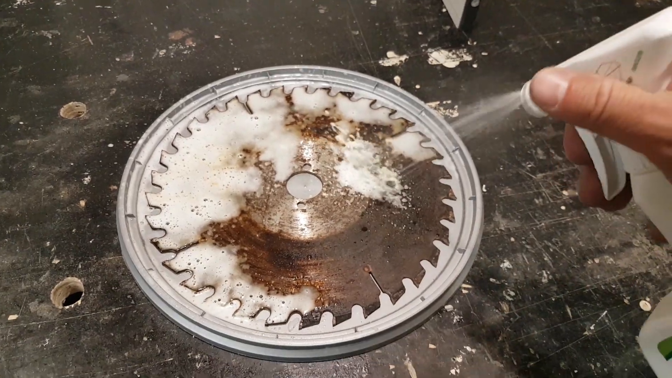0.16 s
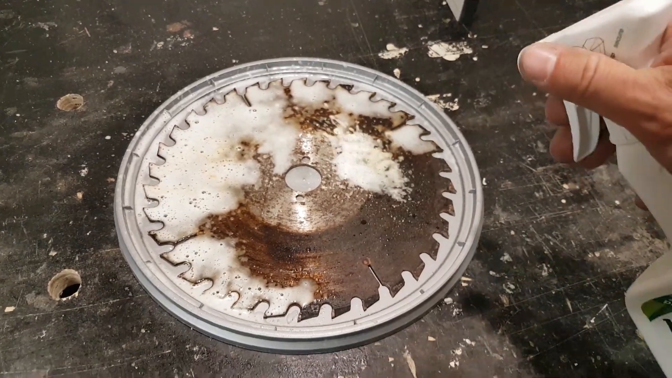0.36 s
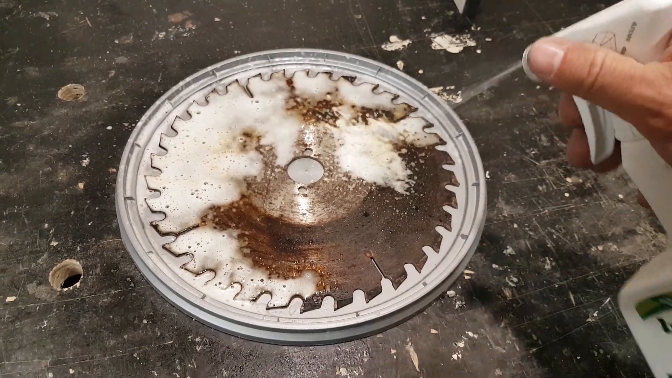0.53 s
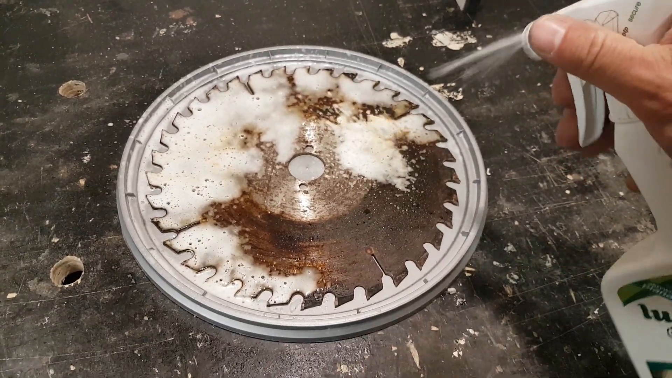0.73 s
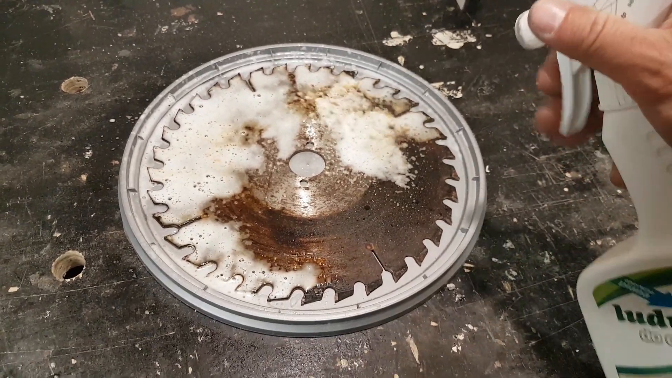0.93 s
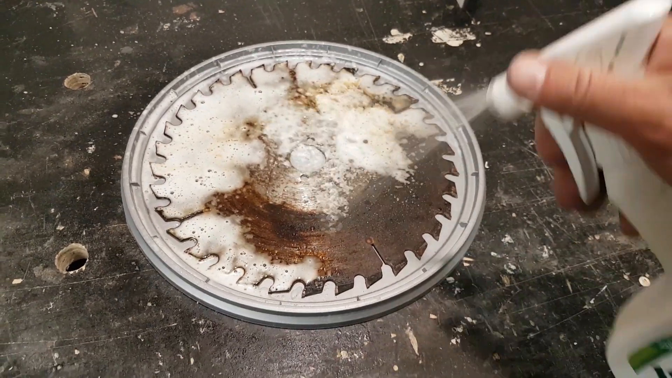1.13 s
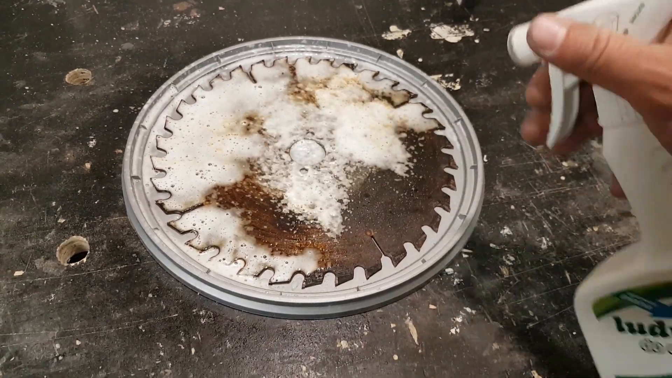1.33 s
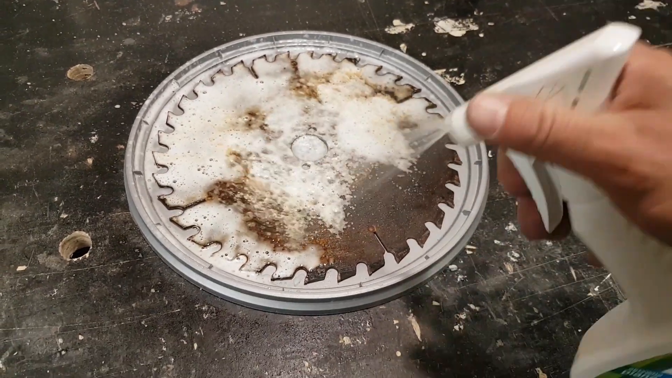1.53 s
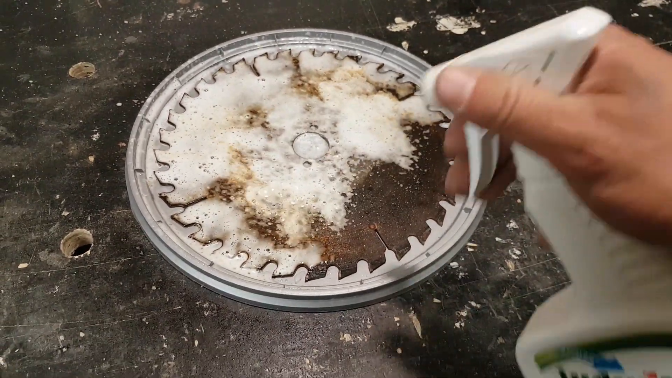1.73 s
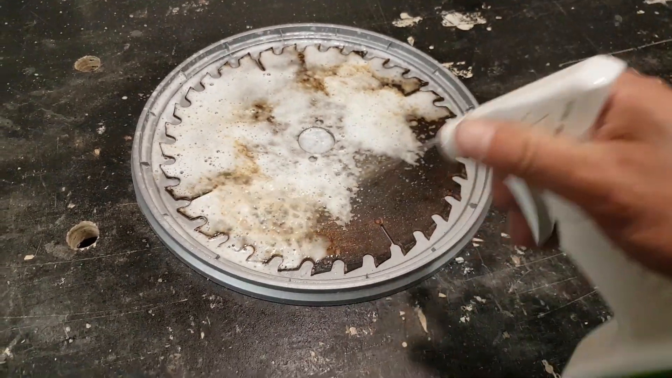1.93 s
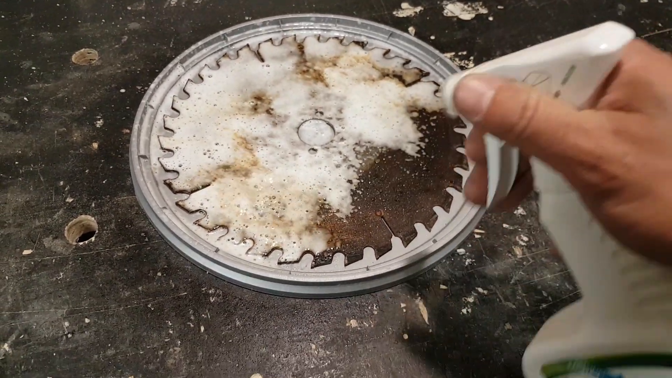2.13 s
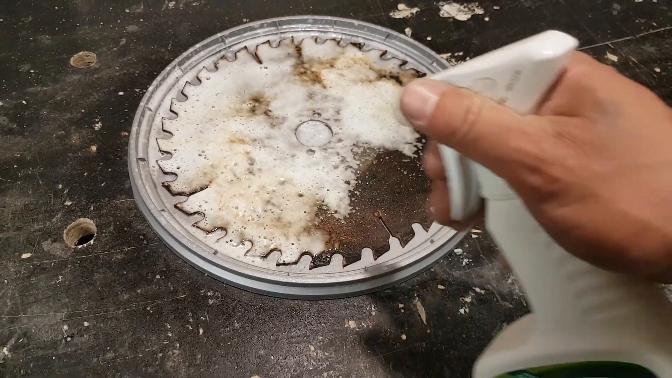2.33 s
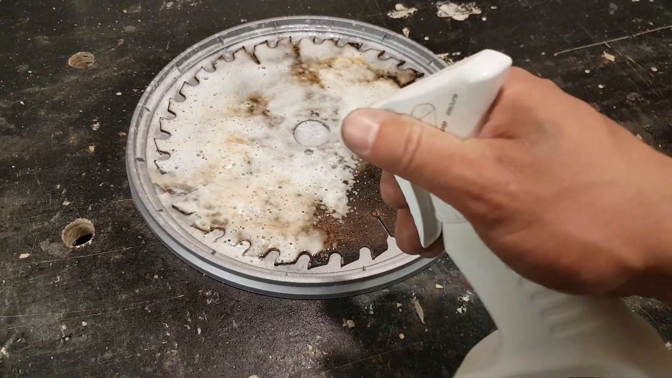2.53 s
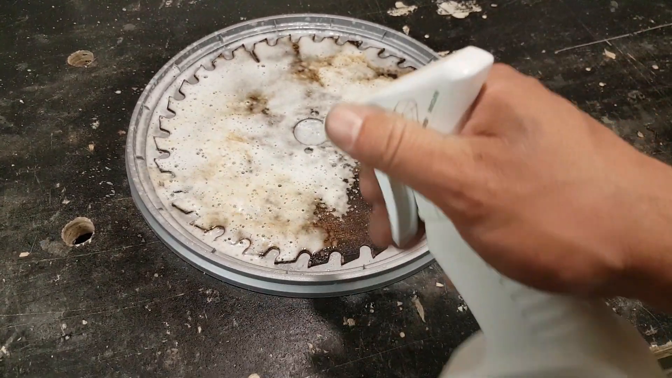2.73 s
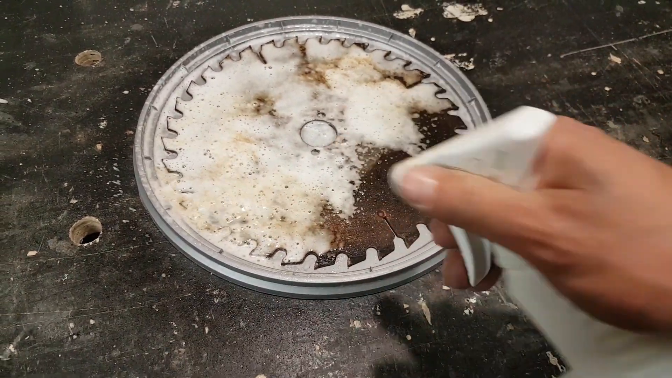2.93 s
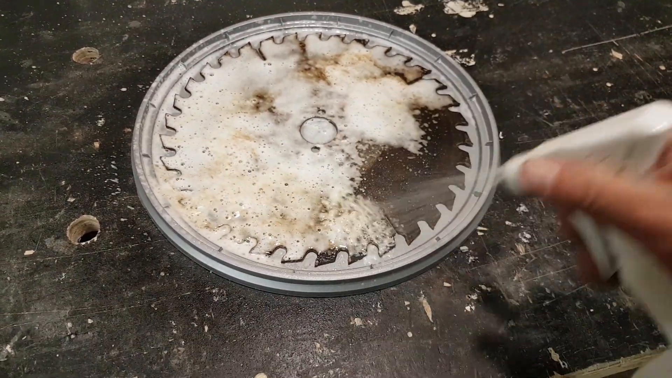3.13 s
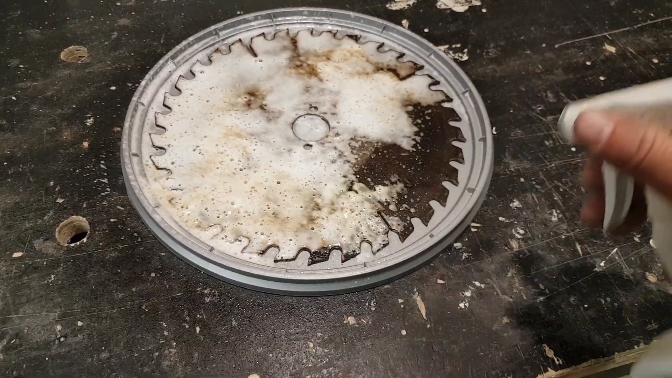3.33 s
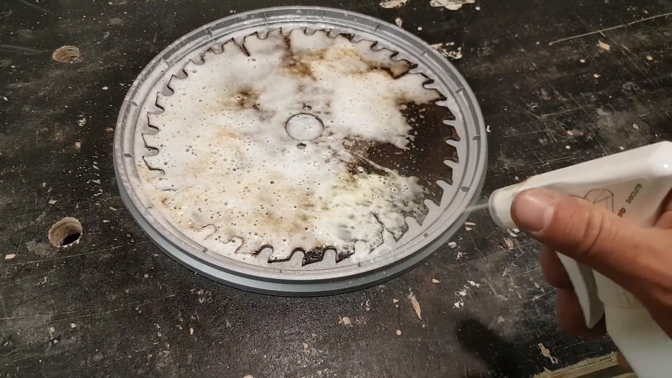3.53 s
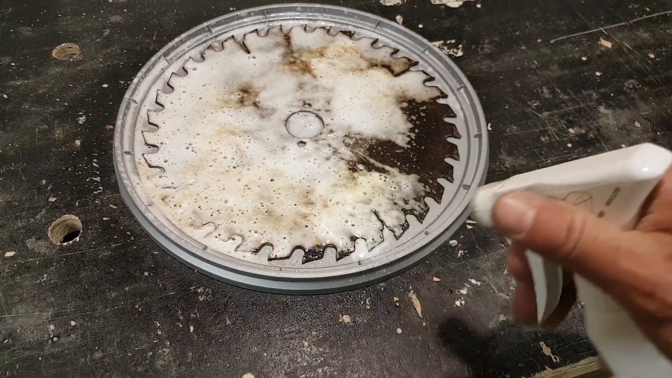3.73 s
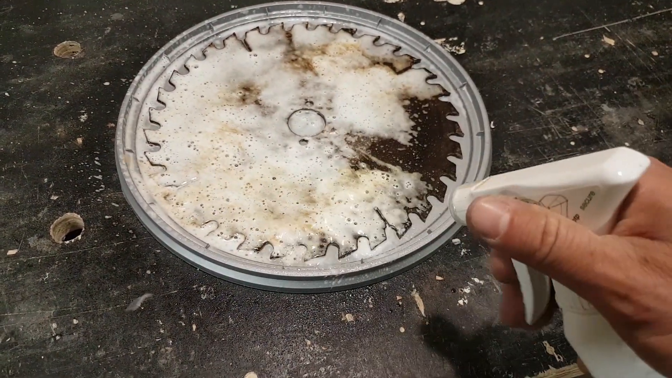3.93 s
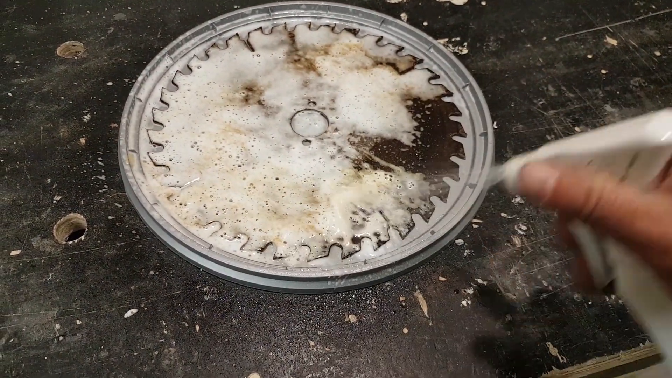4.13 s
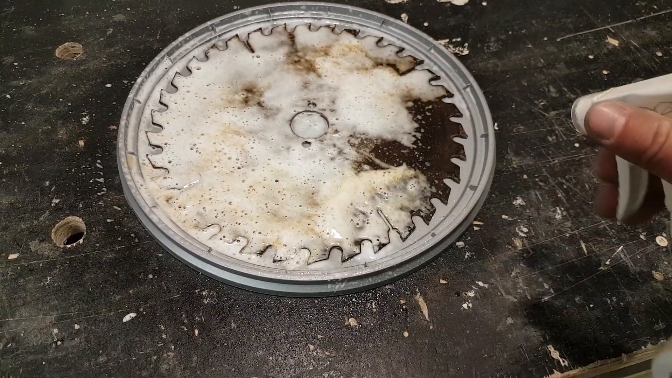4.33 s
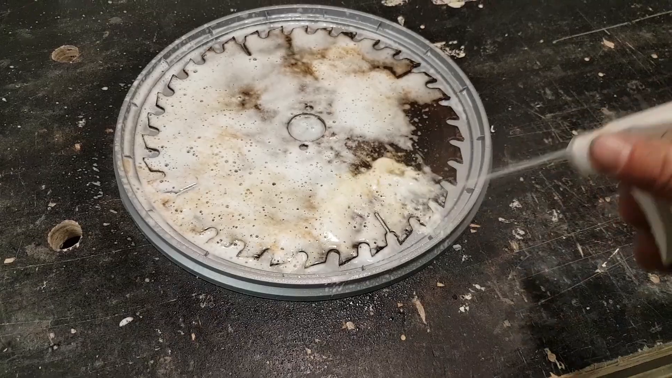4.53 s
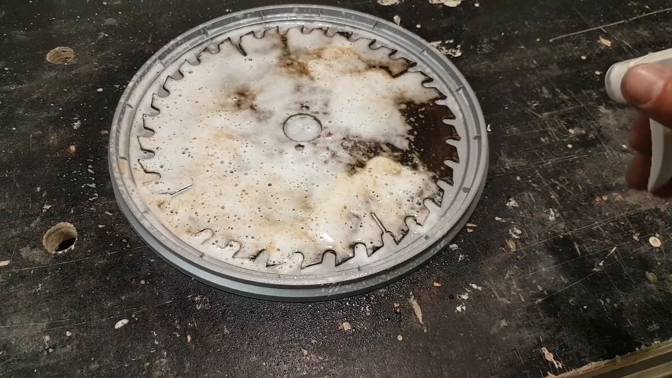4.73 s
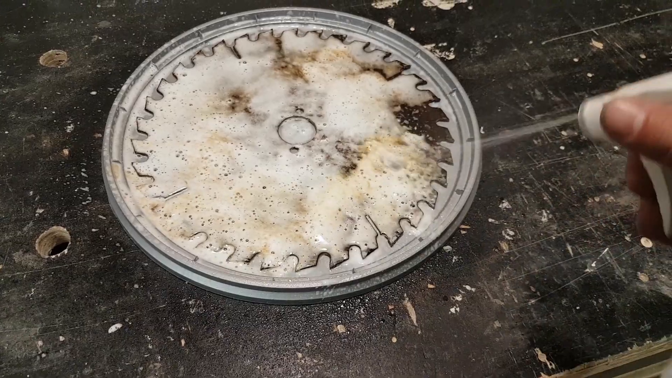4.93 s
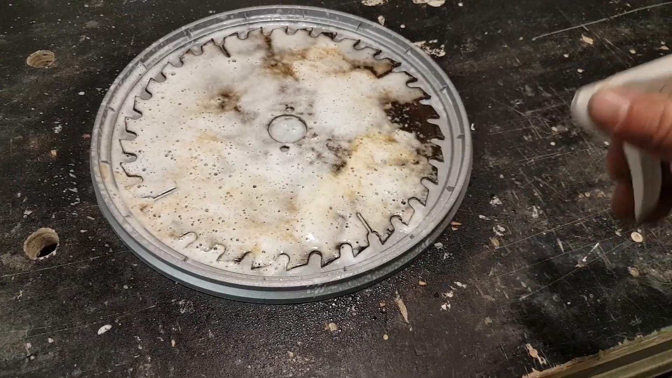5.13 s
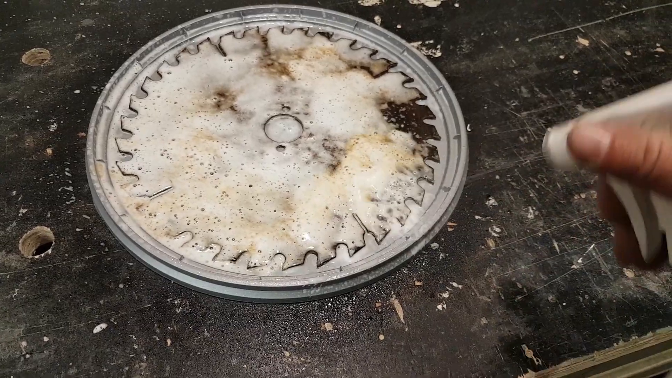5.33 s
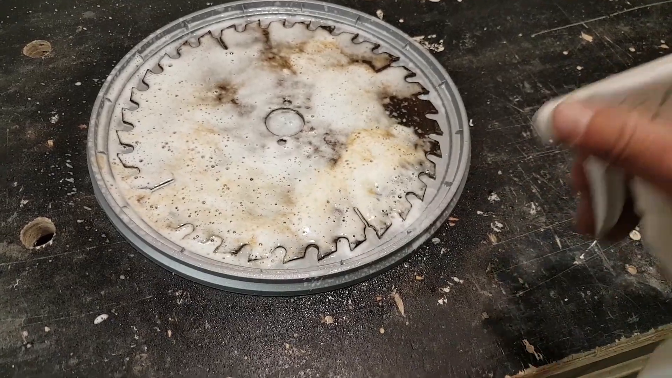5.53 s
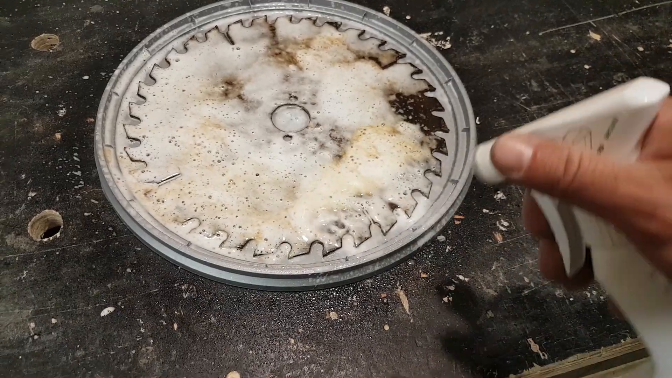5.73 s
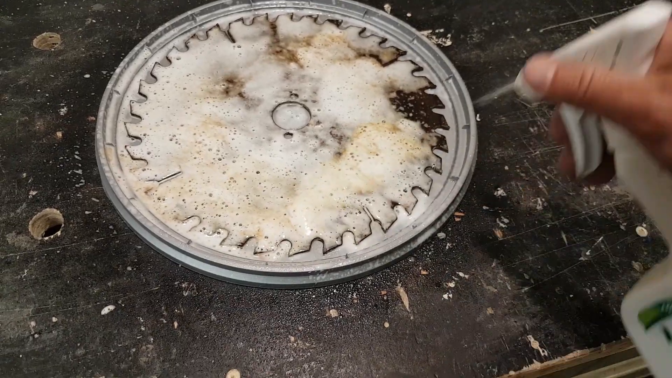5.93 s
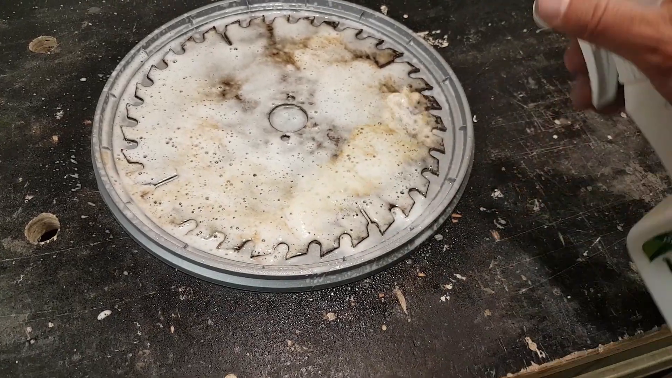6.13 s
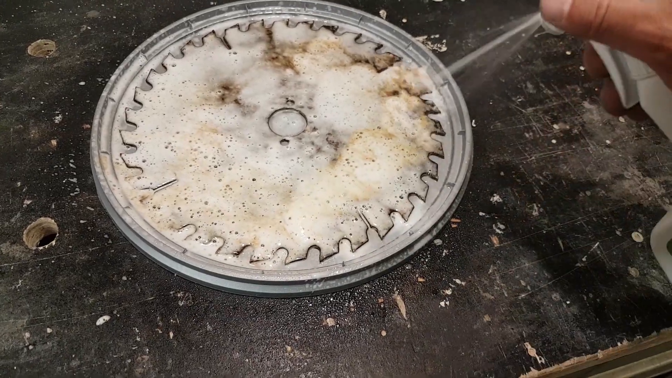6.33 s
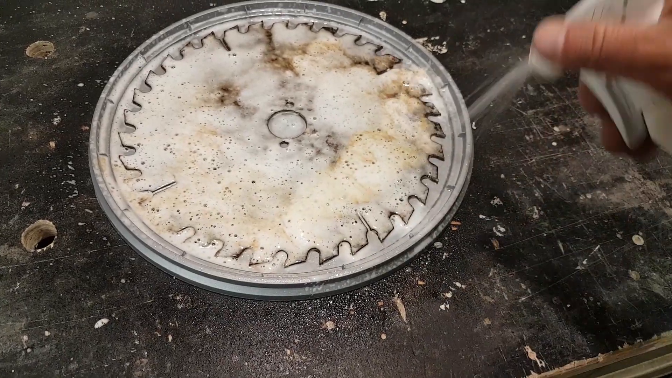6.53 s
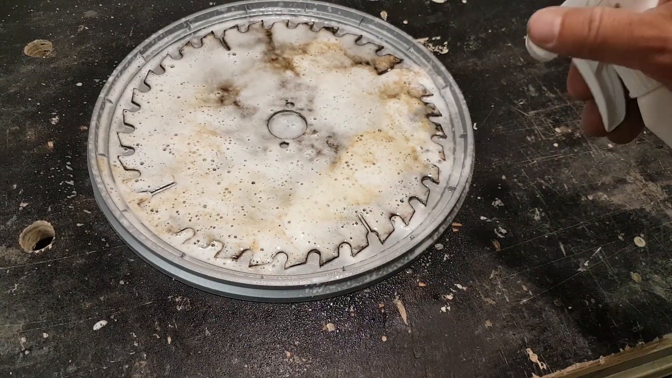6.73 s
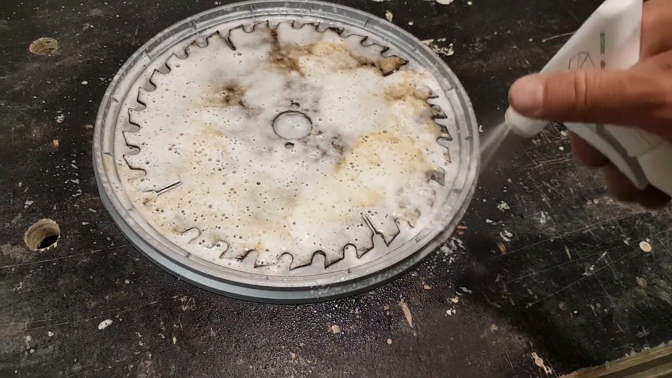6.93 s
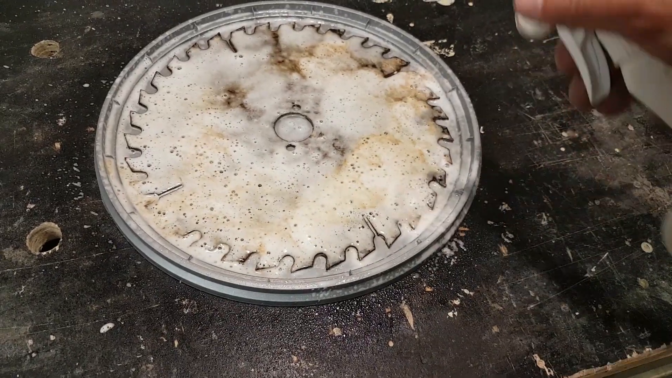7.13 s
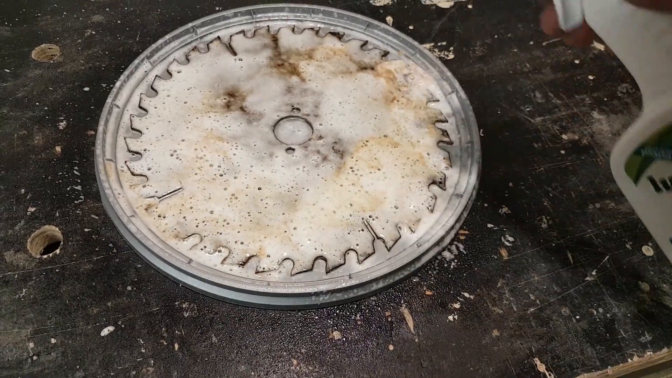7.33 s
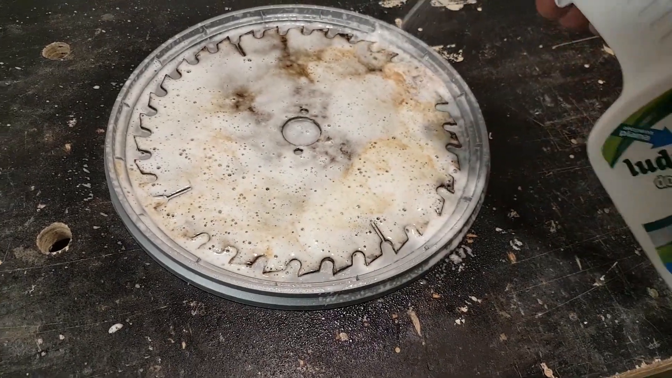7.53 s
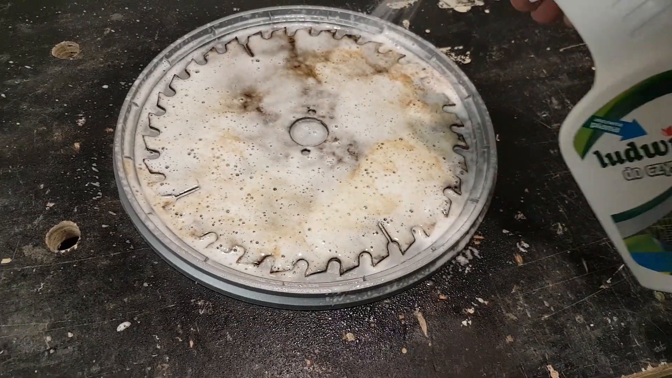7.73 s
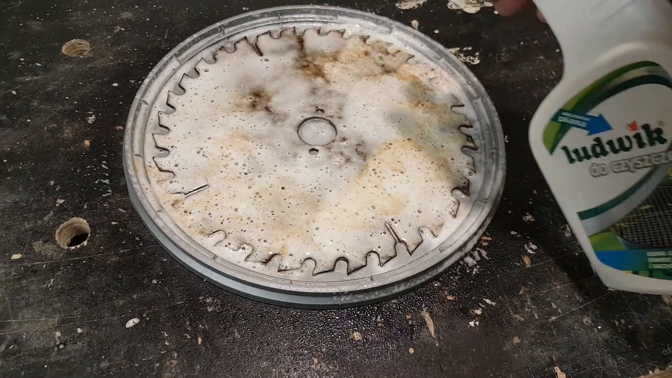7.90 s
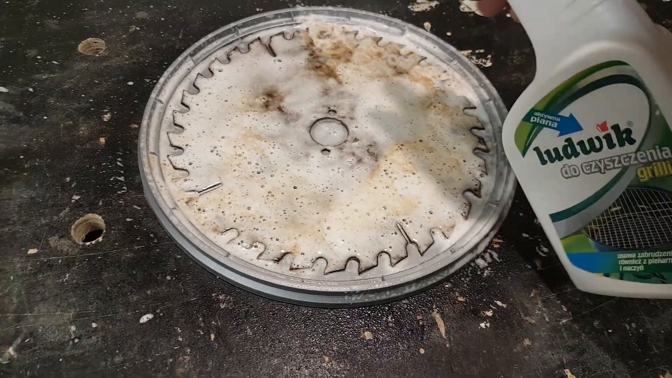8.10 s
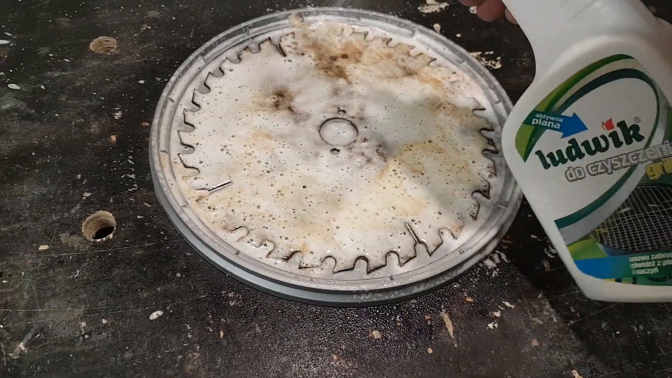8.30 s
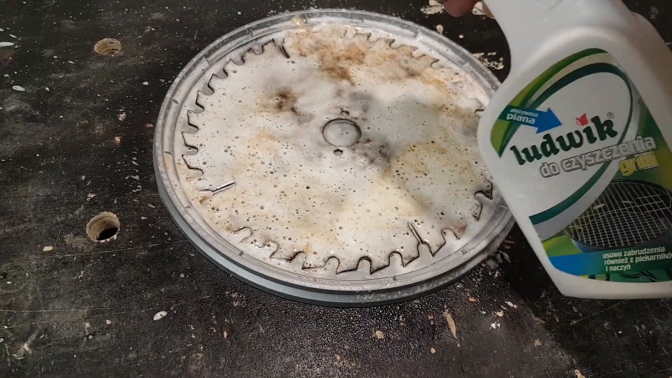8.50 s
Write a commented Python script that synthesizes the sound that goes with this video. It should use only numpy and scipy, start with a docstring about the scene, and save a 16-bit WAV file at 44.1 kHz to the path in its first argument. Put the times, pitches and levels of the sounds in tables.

```python
"""Two faint trigger taps, then a bright hiss: a trigger bottle is pumped about three times a second.
It sprays foam cleaner on a saw blade in a plastic lid, each squeeze being noise in the nozzle's resonances.
Tiny random impacts patter on the foam; the trigger's knock is a ring of sines with a noise snap.
Air sips, single big drops and two dull bench thuds with rebounds join in.
A small workshop answers with decaying noise tails, over quiet air and low rumble."""
import sys
import numpy as np
from scipy import signal
from scipy.fft import rfft, irfft, next_fast_len
from scipy.io import wavfile
from scipy.ndimage import map_coordinates

SR = 44100
rng = np.random.default_rng(int(sys.argv[2]) if len(sys.argv) > 2 else 0)


def int16_out(signal):
    """Quantize to a 16-bit WAV file."""
    q = np.round(np.clip(np.atleast_2d(signal).T, -1, 1) * 32767)
    wavfile.write(sys.argv[1], SR, q.astype(np.int16))


N = 381906  # length [samples]

# Table levels are relative: each layer adds its own trim.
# Squeezes: (start [s], trigger let go [s], hiss [dB], whistle [dB], throat [dB], throat pitch [Hz], splash [dB])
SQUEEZES = [(0.13, 0.318, -29.5, -38.5, -39.5, 3220, -48), (0.484, 0.632, -32.5, -40.5, -38.5, 3460, -54),
            (0.773, .954, -29, -37.5, -36, 3350, -48.5), (1.099, 1.317, -25, -37.5, -37.5, 3180, -45.5),
            (1.493, 1.691, -23.5, -37.5, -37.5, 3170, -46.5), (1.837, 2.029, -24, -36, -37, 3000, -46),
            (2.217, 2.401, -25, -37.5, -35.5, 3250, -46), (2.525, 2.666, -26, -35, -36, 3090, -48),
            (2.795, 2.963, -25, -34.5, -36.5, 3110, -47.5), (3.097, 3.269, -24, -35.5, -40.5, 3300, -45),
            (3.427, 3.65, -26, -37.5, -43.5, 3540, -44), (3.813, 3.984, -26.5, -36.5, -38.5, 3340, -46),
            (4.128, 4.29, -26.5, -35, -41.5, 3300, -47.5), (4.438, 4.651, -26, -38.5, -43, 3780, -44),
            (4.828, 5.038, -27, -38, -38.5, 3480, -46.5), (5.205, 5.421, -29, -39.5, -38.5, 3410, -44.5),
            (5.615, 5.812, -28, -38, -39.5, 3470, -47), (5.988, 6.162, -26.5, -37.5, -39.5, 3550, -48.5),
            (6.292, 6.456, -27, -35, -35.5, 3600, -44), (6.575, 6.724, -28.5, -33.5, -42.5, 3540, -42.5),
            (6.882, 7.064, -28, -33.5, -41.5, 3470, -41), (7.212, 7.367, -31.5, -40, -35, 3580, -44.5),
            (7.483, 7.627, -30, -43, -36, 3420, -46.5), (7.746, 7.89, -33, -43.5, -35.5, 3440, -45),
            (8.006, 8.158, -31, -41.5, -36, 3440, -45.5), (8.277, 8.433, -32, -42, -37, 3330, -48.5),
            (8.562, 8.726, -34, -45, -38, 3200, -45)]
# Mist leaving the nozzle, also the colour of the air sips: (frequency [Hz], level [dB])
MIST_SPECTRUM = [(1500, -56), (4000, -9.5), (5600, -17.5), (6500, -6.5), (7500, -33.5), (9000, -10),
                 (10300, -14.5), (11700, -2.5), (13500, -4), (15000, -2.5), (15700, -1.5), (16000, -24)]
# Fine droplets landing on foam: (frequency [Hz], level [dB])
SPLASH_SPECTRUM = [(150, -19), (400, -12.5), (800, -21), (1300, -3), (2100, -2), (3000, -3), (5000, -2.5),
                   (9000, -8), (16000, -5)]
# Heavy drops slapping the wet blade: (frequency [Hz], level [dB])
SLAP_SPECTRUM = [(200, -32), (700, -15.5), (1250, -5), (2100, 3.5), (2800, -1.5), (4500, -16.5),
                 (10000, -36)]
# Where the nozzle points, as a lean of the top hiss to the left: (time [s], level [dB])
NOZZLE_AIM = [(0, 11), (1.1, 9), (2.55, 17), (4.1, 12), (4.5, 8.5), (6.3, 10), (7.2, 2.5), (8, 11)]
# Thin edge tone, faint until it sings in the last squirts: (time [s], level [dB])
EDGE_LEVEL = [(7.3, -56), (7.75, -35.5), (8.3, -39), (8.6, -36)]
# The pump's ring: (frequency [Hz], level [dB], decay by 60 dB [s], rise [s])
PUMP_MODES = [(126, -7.5, 0.097, 0.011), (219, -1.5, 0.061, 0.0079), (259, -1.5, 0.053, 0.0021),
              (314.6, 2, 0.039, 0.0013), (522, -7.5, 0.081, 0.0032), (649, -5, 0.035, 0.00029),
              (727, 3.5, 0.0081, 0.00076), (1317, 3, 0.03, 0.0001), (1530, -8, 0.0038, 0.00035)]
# The lever's ring: (frequency [Hz], level [dB], decay by 60 dB [s], rise [s])
LEVER_MODES = [(307, 11, 0.034, 0.0019), (484, 7.5, 0.032, 0.002), (668, 3, 0.02, 0.0018),
               (754, 7.5, 0.014, 0.0013), (1520, -2, 0.031, 0.00071)]
# The hollow plastic body: (frequency [Hz], level [dB])
BODY_SPECTRUM = [(70, -35), (170, -8), (280, -5.5), (550, -6.5), (800, -5.5), (1000, -13), (1400, -8.5),
                 (2000, -12), (4000, -35), (12000, -43)]
# Two taps as the finger takes up the trigger's slack: (time before the squeeze [s], peak [dB])
SLACK_TAPS = [(.052, -44.5), (.025, -46.5)]
# The pump sucks air with a brief hiss as it refills: (time [s], level [dB])
SIPS = [(1.73, -57), (2.075, -56), (3.012, -51), (3.315, -47.5), (3.70, -52), (4.335, -48.5), (6.774, -55),
        (7.111, -47.5)]
# Big drops and spits: (time [s], peak [dB])
SPITS = [(.3394, -44), (1.1734, -22.5), (1.1925, -24), (1.212, -30), (1.7953, -41), (1.9484, -36),
         (6.341, -17.5), (6.3524, -19.5), (6.3664, -19.5), (6.3784, -25), (6.4234, -27.5)]
# Thuds in the bench and their rebounds: (time [s], level [dB], rattle [dB], low boom [dB])
THUDS = [(.735, -33, -12, -23), (.769, -44, -16, -10), (6.194, -23, -3, -9.5), (6.221, -37.5, 0, -17),
         (6.243, -36, -4, 0.5), (6.269, -39, -17, 4)]
# The bench's ring: (frequency [Hz], level [dB], decay by 60 dB [s], rise [s])
BENCH_MODES = [(70.7, -32, .3, .004), (117, -12, 0.34, 0.01), (139.3, -4, 0.82, 0.0026),
               (175, 10, 0.056, 0.0011), (223.7, -3, 0.208, 0.0011), (265, -4, 0.14, 0.00092),
               (370, -10.5, 0.27, 0.0009), (403, -9, 0.14, 0.0011), (518.5, -9, 0.2, 0.0011),
               (654, -22.5, 0.2, 0.00102)]
# Loose things on the bench: (frequency [Hz], level [dB])
RATTLE_SPECTRUM = [(60, -24), (160, -8), (260, 4.5), (400, -11), (600, -1.5), (850, -16), (2300, -11.5),
                   (4000, -44)]
# The bench's deep boom: (frequency [Hz], level [dB])
BOOM_SPECTRUM = [(25, -37.5), (55, -12.5), (90, -22), (140, -2), (220, -11), (400, -28), (1000, -72)]
# The workshop's tail: (frequency [Hz], decay by 60 dB [s])
ROOM_DECAY = [(150, 0.1), (600, 0.61), (1500, 0.45), (3500, 0.37), (8000, 0.27), (13000, 0.21),
              (16000, 0.2)]
# Still air: (frequency [Hz], level [dB])
AIR_SPECTRUM = [(15, -57), (25, -14.5), (90, -2), (263, 0.5), (416, -15), (545, -16), (624, -16),
                (775, -31), (887, -12), (1370, -15.5), (3920, -17.5), (9570, -33), (14800, -13.5),
                (16000, -48)]
# Low room noise and the handling rattles: (time [s], level [dB])
MURK_LEVEL = [(0, -69), (1, -67), (2.5, -59.5), (5.7, -65), (6.3, -59.5), (7.4, -61), (7.8, -51.5),
              (8.66, -65)]
# Brief swells of low rumble: (time [s], level [dB])
RUMBLE_SWELLS = [(4.01, -52), (4.16, -59)]
# The right microphone is shaded against the left one: (frequency [Hz], level [dB])
RIGHT_SHADE = [(200, -0.5), (600, -1), (1300, -7), (2100, -8.5), (3200, -11), (4400, -3.5), (5400, 2),
               (6400, -1.5), (7500, -10.5), (8800, -6.5), (10200, 3.5), (11800, -11), (13500, -1),
               (15400, -11.5)]

VALVE_LEAD_S = 0.0049  # the valve cracks open just before the stroke
ATTACK_S, USUAL_LENGTH_S, LAZINESS = 0.017, 0.13, 0.84  # pressure builds more slowly in a longer stroke
CLOSE_S, DWELL_S = 0.015, 0.02644  # pressure fades as the piston bottoms out; the finger rests before letting go
FLIGHT_S, LINGER_S = 0.00067, 0.027  # the foam lands a little later and goes on landing after the jet stops
SKEW = 1.033  # the landing peaks after mid-stroke
HISS_HZ, HISS_WIDTH_HZ = 13600, 1830  # the nozzle's broad top resonance
WHISTLE_HZ, THROAT_HZ, WHISTLE_FOLLOWS = 7614, 3450, 0.16  # usual pitches; the whistle follows slightly
THROAT_SAG = 0.15  # how strongly the throat sinks over a stroke as foam fills the nozzle
SING_HZ, SING_WIDTH_HZ = 14000, 580  # the edge tone
BRIGHTENS, USUAL_HISS_DB = 0.5, -27.5  # extra top dB for each dB that a squeeze is stronger than usual
SURGE_DB = 0.8  # depth of the jet's slower unsteadiness
KNOCK_DB = -35  # peak of the trigger springing back, before the room
HURRIED_S, CALM_DB_PER_S = 0.12, 217.5  # after longer pauses than this the taps are softer
TAP_SNAP_S = 0.025  # the tap's snap falls 60 dB in this time
SIP_RISE_DB_PER_S, SIP_FALL_DB_PER_S = 1100, 651  # a sip swells faster than it fades
SWELL_S = 0.022  # time from a rumble swell's top to 1 dB down
FUMBLE_DB = 3.5  # unsteadiness of the handling rattles
TOP_HZ = 15750  # upper band limit


def spray():
    """Each squeeze sounds at the nozzle first, then where the foam lands."""
    out = np.zeros((2, N))
    lead = 0.02  # room for the valve to open before the stroke [s]
    t = np.arange(SR // 3) / SR - lead
    for start, let_go, *voice, splash_db in SQUEEZES:
        length = let_go - DWELL_S - start
        jet = nozzle(t, length, curve(EDGE_LEVEL, start), *voice)
        landing = foam(t, length, splash_db)
        left, right = glance(jet + landing, echo=0.21, drift=0.00081)
        # the top hiss follows the nozzle's aim
        beam = [(500, 1), (1500, -4.5), (8000, -3), (12000, 4 - curve(NOZZLE_AIM, start))]
        # the right side hears it 0.07 ms earlier
        right = filtered(right, lambda hz: amp(along(beam, hz)) * np.exp(2j * np.pi * hz * 0.00007))
        squirt = amp(2.5) * np.array([left, right])
        add(out, start - lead, moving_in_room(squirt, wet_db=-14.0))
    return out


def nozzle(t, length, edge_db, hiss_db, whistle_db, throat_db, throat_hz):
    """Turbulence in the foam nozzle's resonances; the top hiss grows fastest with flow."""
    n = len(t)
    attack = ATTACK_S * (length / USUAL_LENGTH_S) ** LAZINESS
    flow = build_up(t + VALVE_LEAD_S, attack) * build_up(length - t, CLOSE_S)

    shelf = [(10300, 0), (11700, BRIGHTENS * (hiss_db - USUAL_HISS_DB))]

    def mist_response(hz):
        """The mist's colour, lifted by the nozzle's top resonance."""
        colour = amp(along(MIST_SPECTRUM, hz) + along(shelf, hz))
        return colour * (1 + 0.96 * resonance(hz, HISS_HZ, HISS_WIDTH_HZ))

    mist = filtered(noise(n, 0.31), mist_response)
    edge = filtered(noise(n, 0.4), lambda hz: resonance(hz, SING_HZ, SING_WIDTH_HZ) ** 2)
    whistle_hz = WHISTLE_HZ * (throat_hz / THROAT_HZ) ** WHISTLE_FOLLOWS
    whistle = filtered(noise(n, 0.21), lambda hz: resonance(hz, whistle_hz, 1280) ** 2)
    throat = filtered(noise(n, 0.69),
                      lambda hz: resonance(hz, throat_hz, 1150) * resonance(hz, throat_hz, 2200) ** 2)
    # reading the throat noise ever more slowly lowers its pitch
    pace = 1 + THROAT_SAG * (0.35 - np.clip(t / length, 0, 1))
    throat = np.array([np.interp(np.cumsum(pace), np.arange(n), side) for side in throat])

    top = amp(hiss_db + 1.17) * unit(mist) + amp(edge_db) * unit(edge)
    jet = (flow ** 2.24 * top
           + flow ** 1.1 * amp(whistle_db + 2.0) * unit(whistle)
           + flow ** 0.95 * amp(throat_db - 0.76) * unit(throat))
    sputter_db = 1.3 * wobble(n, 900) + SURGE_DB * wobble(n, 57.8)  # the jet tears into drops
    return jet * amp(sputter_db)


def build_up(t, time_s):
    """Pressure rises from 0 at t = 0 towards 1."""
    return 1 - np.exp(-np.maximum(t, 0) / time_s)


def foam(t, length, splash_db):
    """The landing spray swells and fades in one arch; heavy drops gather near its top."""
    progress = np.clip((t - FLIGHT_S) / (length + LINGER_S), 0, 1)
    arch = np.abs(np.sin(np.pi * progress ** SKEW))
    level = amp(splash_db + 5.0)
    fine = level * arch ** 0.69 * patter(len(t), SPLASH_SPECTRUM, rate=6000, spread_db=4.5)
    heavy = level * arch ** 2.4 * patter(len(t), SLAP_SPECTRUM, rate=2000, spread_db=0)
    return fine + heavy


def patter(n, spectrum, rate, spread_db):
    """Many tiny impacts, rate a second on average; spread_db makes their sizes unequal."""
    hits = (rng.random(n) < rate / SR) * amp(spread_db * rng.standard_normal(n))
    return coloured(hits * noise(n, 0.54), spectrum)


def trigger():
    """The spring throws the piston back with a knock; two taps lead into each squeeze, louder when hurried."""
    out = np.zeros((2, N))
    t = np.arange(SR // 6) / SR
    last_let_go = -0.031
    for start, let_go, *_ in SQUEEZES:
        calm_db = CALM_DB_PER_S * (start - last_let_go - HURRIED_S)
        for before, db in SLACK_TAPS:
            tap = amp(db - calm_db) * clack(LEVER_MODES, t, detune=0.08, snap_db=-12, snap_t60=TAP_SNAP_S)
            add(out, start - before, in_room(tap, wet_db=-26.5))
        knock = amp(KNOCK_DB) * clack(PUMP_MODES, t, detune=0.03, snap_db=-6.5, snap_t60=0.015)
        add(out, let_go + 0.00195, in_room(knock, wet_db=-11))
        last_let_go = let_go
    return out


def clack(modes, t, detune, snap_db, snap_t60):
    """Plastic on plastic: a broad snap in the hollow body and a short ring, peak 1."""
    snap = coloured(rng.standard_normal(len(t)), BODY_SPECTRUM) * amp(snap_db - 60 * t / snap_t60)
    y = ring(modes, t, detune) + snap
    return y / np.abs(y).max()


def sips():
    """Now and then the refilling pump sips air: a short swell of mist-coloured noise."""
    out = np.zeros((2, N))
    t = np.arange(-SR // 20, SR // 8) / SR
    for s, db in SIPS:
        swell_db = np.minimum(SIP_RISE_DB_PER_S * t, -SIP_FALL_DB_PER_S * t)
        level_db = db + 1 + swell_db + 2 * wobble(len(t), 296)
        sip = amp(level_db) * coloured(noise(len(t), 0.26), MIST_SPECTRUM)
        add(out, s + t[0], in_room(sip, wet_db=-22))
    return out


def spits():
    """Single big drops snap above the patter as fast-dying noise bursts."""
    out = np.zeros((2, N))
    t = np.arange(SR // 30) / SR
    colour = [(200, -20), (700, -10.5), (1300, 2), (3000, 0), (6500, -15), (16000, -20)]
    for s, db in SPITS:
        snap = coloured(noise(len(t), 0.71), colour) * amp(-60 * t / 0.036)
        add(out, s, in_room(amp(db + 0.5) * snap / np.abs(snap).max(), wet_db=-16.5))
    return out


def thuds():
    """The bench booms under a soft blow, and loose things on it rattle briefly."""
    out = np.zeros((2, N))
    n = SR // 2
    t = np.arange(n) / SR
    contact = np.sin(np.pi / 2 * np.clip(t / 0.004, 0, 1)) ** 2  # a soft contact has no click
    for s, db, rattle_db, boom_db in THUDS:
        wood = ring(BENCH_MODES, t, detune=0.0041) * amp(-40 * t)  # things lying on the bench damp it
        rattle_fade_db = rattle_db - 5.5 - 60 * t / 0.14 + 1.7 * wobble(n, 120)
        rattle = coloured(noise(n, 0.89), RATTLE_SPECTRUM) * amp(rattle_fade_db)
        boom = coloured(noise(n, 0.98), BOOM_SPECTRUM) * amp(boom_db - 6 - 60 * t / 0.31)
        blow = amp(db - 0.5) * contact * (wood + rattle + boom)
        add(out, s, in_room(blow, wet_db=-10.5))
    return out


def air():
    """Quiet room noise, small rattles of the handled bottle, and a low rumble that swells twice."""
    t = np.arange(N) / SR
    murk_db = curve(MURK_LEVEL, t)
    low_colour = [(40, -40), (130, -4.5), (260, -11.5), (400, -6), (550, -2), (900, -13),
                  (2500, -16.5), (8000, -30)]
    rumble_colour = [(20, -0.5), (45, -8), (90, -11), (200, -34.0), (800, -66)]
    still = amp(-65.5) * coloured(noise(N, 0.45), AIR_SPECTRUM)
    low = amp(murk_db - 4.5) * coloured(noise(N, 0.91), low_colour)
    fumble = amp(murk_db - 7.5 + FUMBLE_DB * wobble(N, 12))
    handling = fumble * patter(N, BODY_SPECTRUM, rate=160, spread_db=1.5)
    swells = sum(amp(db - ((t - s) / SWELL_S) ** 2) for s, db in RUMBLE_SWELLS)
    rumble = swells * coloured(noise(N, 0.23), rumble_colour)
    return still + low + handling + rumble


def glance(x, echo, drift, count=4):
    """Short echoes off the bench, lid and hand; their paths slide as the bottle moves."""
    i = np.arange(x.shape[-1])
    out = x.copy()
    for side in range(2):
        lags = rng.uniform(0.0004986, 0.005, count)  # [s]
        slides = rng.normal(0, drift, count)
        for lag, slide in zip(lags, slides):
            out[side] += echo * map_coordinates(x[side], [i * (1 + slide) - lag * SR])
    return out / np.sqrt(1 + count * echo ** 2)


def moving_in_room(x, wet_db, count=4):
    """The bottle moves, so each part of a squirt meets a different tail, crossfading every 60 ms."""
    place = np.minimum(np.arange(x.shape[-1]) / (0.06 * SR), count - 1)
    return sum(in_room(x * np.maximum(1 - np.abs(place - k), 0), wet_db) for k in range(count))


def in_room(x, wet_db):
    """A sound followed by the workshop's tail, each frequency dying at its own speed."""
    hz, t, z = signal.stft(rng.standard_normal((2, SR // 3)), SR, nperseg=256)
    decay = amp(-60 * t / along(ROOM_DECAY, hz)[:, None])
    onset = 1 - np.exp(-t / 0.021)
    tail = signal.istft(z * decay * onset, SR, nperseg=256)[1]
    tail = tail / np.linalg.norm(tail[0])
    source = np.atleast_2d(x)[:1]  # the left or only side feeds both tails
    out = amp(wet_db) * signal.fftconvolve(source, tail, axes=1)
    out[:, :x.shape[-1]] += x
    return out


def ring(modes, t, detune):
    """One blow starts all modes together, with peak 1; strengths and pitches vary with the contact."""
    y = np.zeros(len(t))
    for hz, db, t60, rise in modes:
        envelope = amp(db + rng.normal(0, 2.4) - 60 * t / t60) * (1 - np.exp(-t / rise))
        y += envelope * np.sin(2 * np.pi * hz * (1 + detune * rng.normal()) * t)
    return y / np.abs(y).max()


def resonance(hz, centre_hz, width_hz):
    """A causal band-pass: the response of one damped resonator."""
    return 1j * hz * width_hz / (centre_hz ** 2 - hz ** 2 + 1j * hz * width_hz)


def noise(n, alike):
    """Stereo noise whose sides share a part."""
    alike = np.clip(alike, 0, 1)
    shared = np.sqrt(alike) * rng.standard_normal(n)
    return shared + np.sqrt(1 - alike) * rng.standard_normal((2, n))


def wobble(n, rate):
    """A smooth random curve, rate knots a second."""
    knots = rng.standard_normal(int(n * rate / SR) + 4)
    return map_coordinates(knots, [np.arange(n) * rate / SR])


def filtered(x, response):
    """x times a response of frequency."""
    n = x.shape[-1]
    m = next_fast_len(n + SR // 20)
    return irfft(rfft(x, m) * response(np.fft.rfftfreq(m, 1 / SR)), m)[..., :n]


def coloured(x, spectrum):
    """x shaped by (frequency [Hz], level [dB]) points, at rms 1."""
    return unit(filtered(x, lambda hz: amp(along(spectrum, hz))))


def along(points, hz):
    """(frequency [Hz], value) points joined on a log frequency axis."""
    f, v = np.transpose(points)
    return np.interp(np.log(hz + 1), np.log(f + 1), v)


def curve(rows, t):
    """(time [s], value) rows joined by straight lines."""
    return np.interp(t, *np.transpose(rows))


def amp(db):
    """Decibels to gain."""
    return 10 ** (np.asarray(db) / 20)


def unit(x):
    """Scale to rms 1."""
    return x / np.sqrt(np.mean(x ** 2) + 1e-20)


def add(track, s, sound):
    """Mix a sound in at time s, cut at the track's end."""
    i = max(round(s * SR), 0)
    part = track[..., i:i + sound.shape[-1]]
    part += sound[..., :part.shape[-1]]


def scene():
    """All sources at the two microphones."""
    return spray() + trigger() + sips() + spits() + thuds() + air()


def record(dry):
    """The right microphone is shaded, and both sides fall off steeply at the band limit."""
    right = filtered(dry[1], lambda hz: amp(along(RIGHT_SHADE, hz)))
    heard = np.array([dry[0], right])
    return filtered(heard, lambda hz: 1 / np.sqrt(1 + (hz / TOP_HZ) ** 280))


dry = scene()
out = record(dry)
int16_out(out)
```